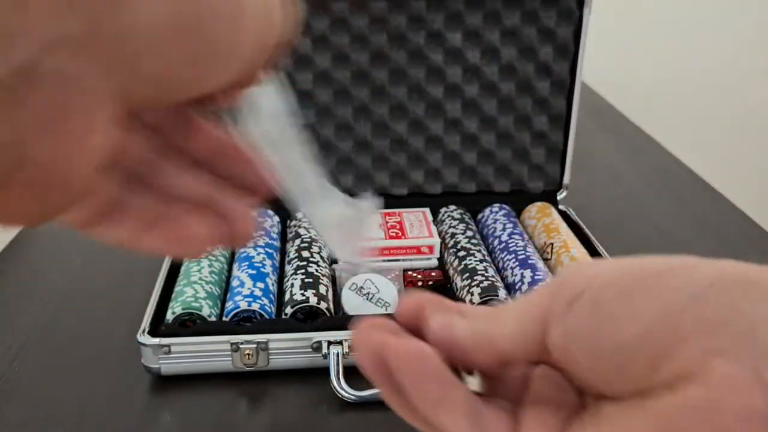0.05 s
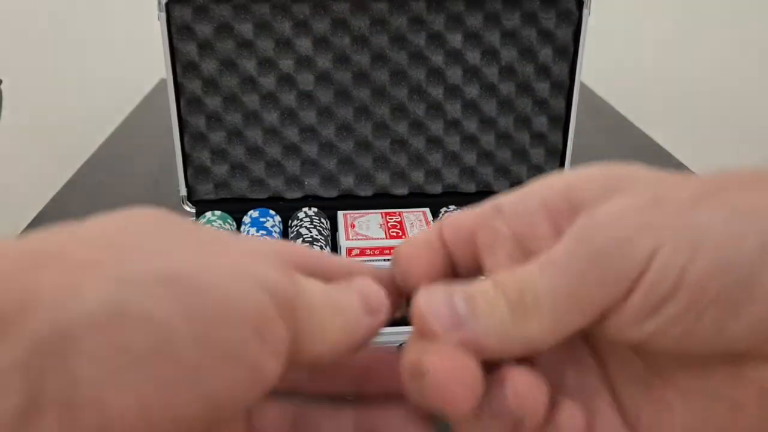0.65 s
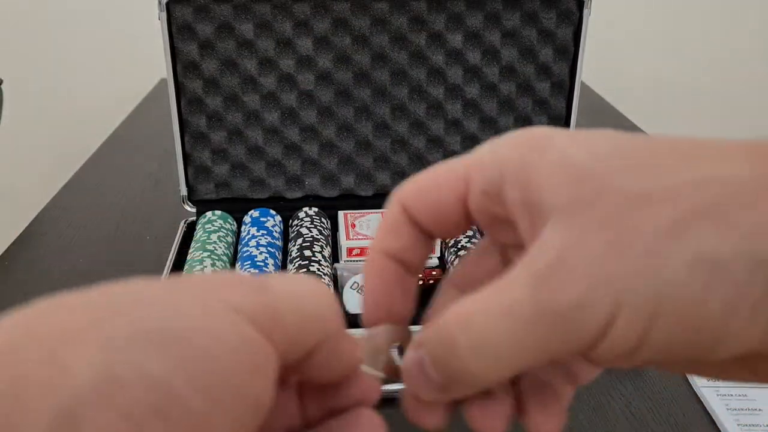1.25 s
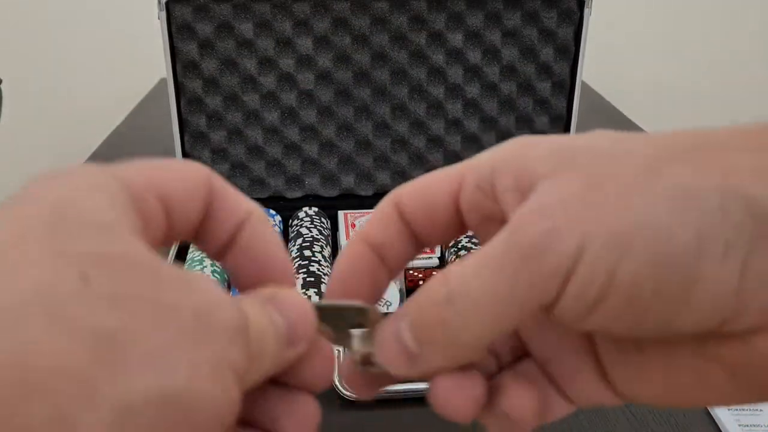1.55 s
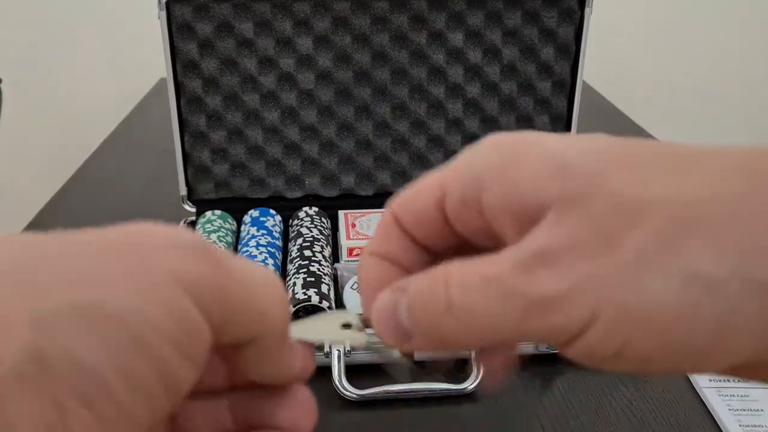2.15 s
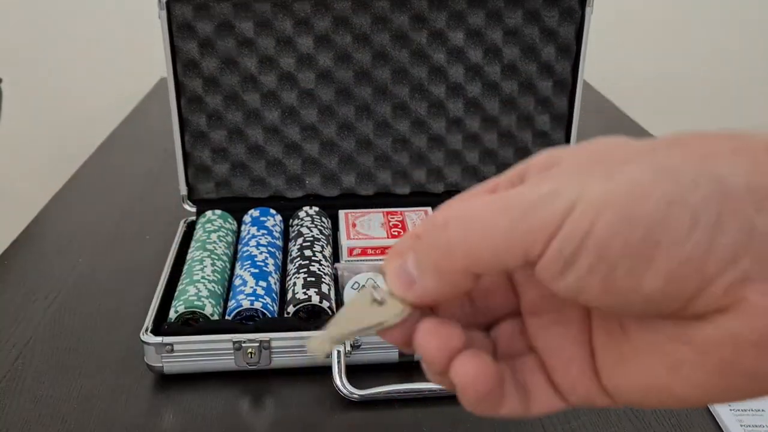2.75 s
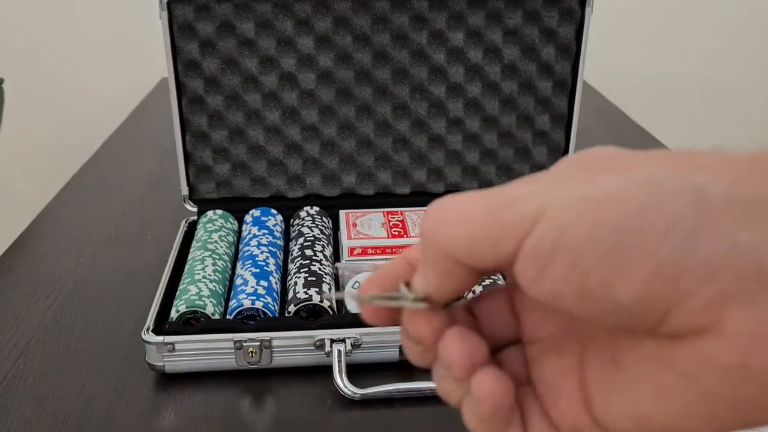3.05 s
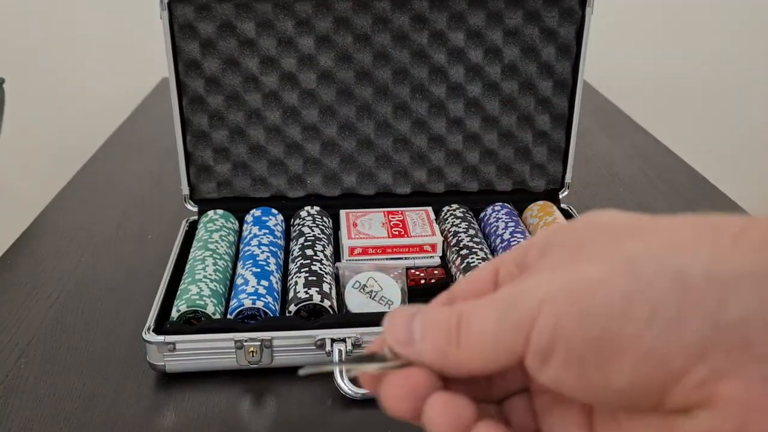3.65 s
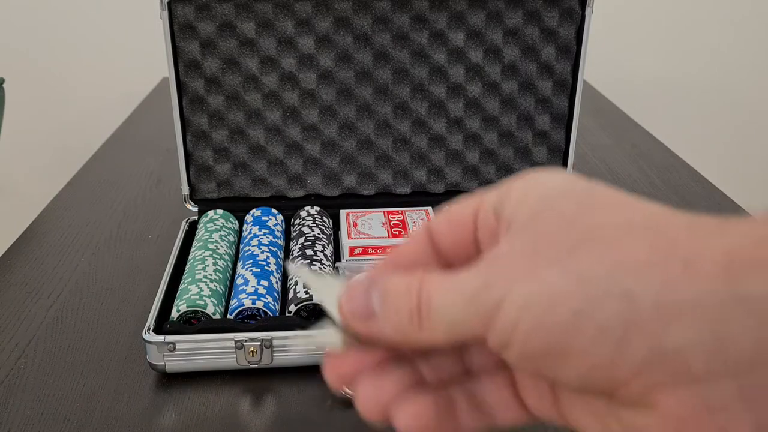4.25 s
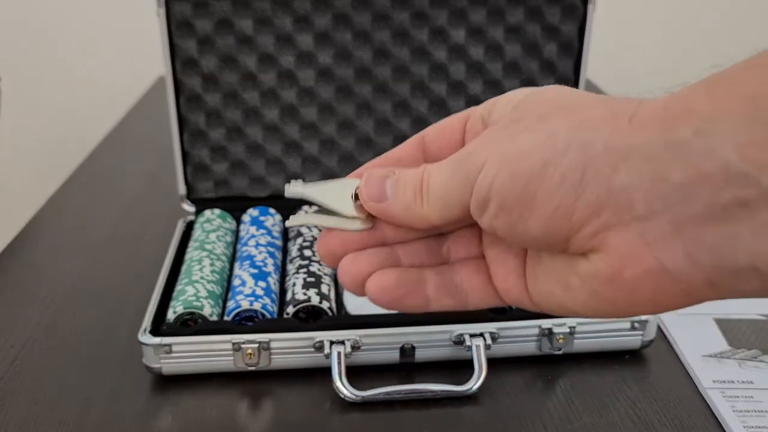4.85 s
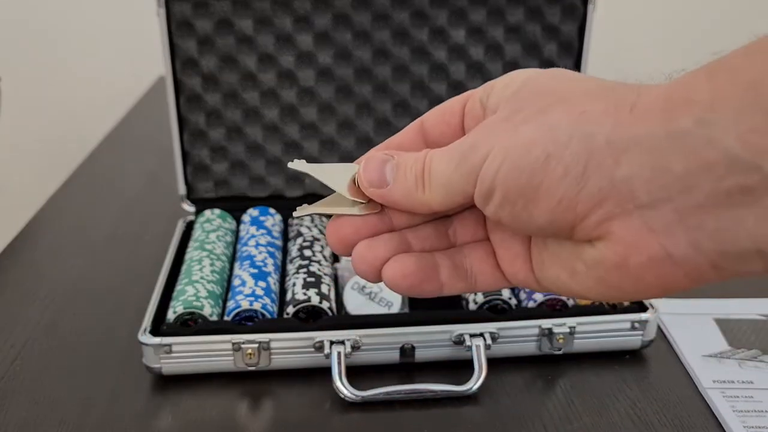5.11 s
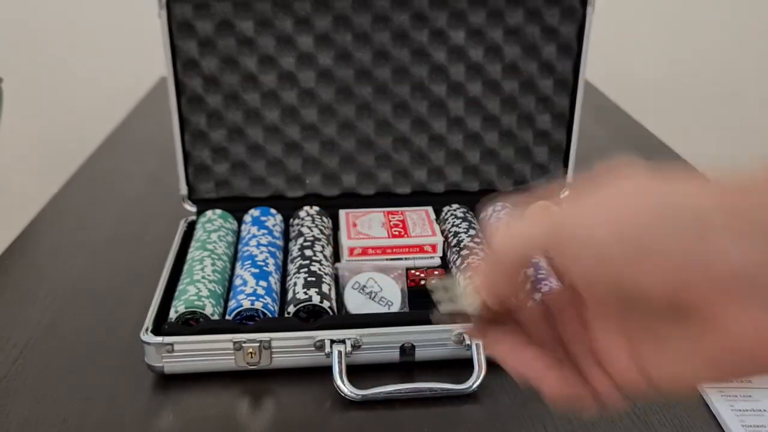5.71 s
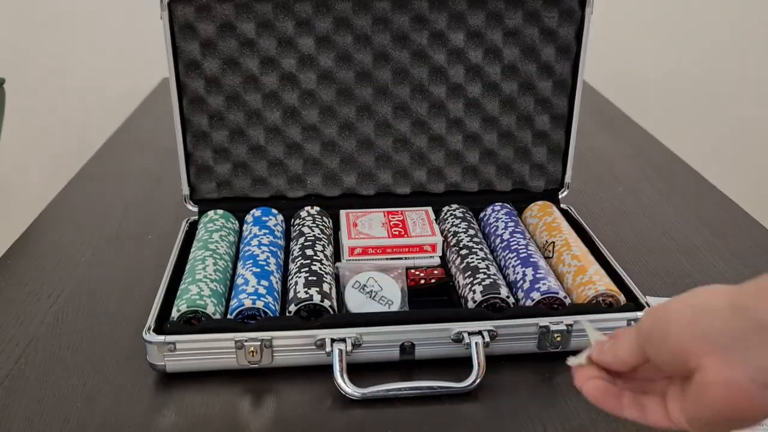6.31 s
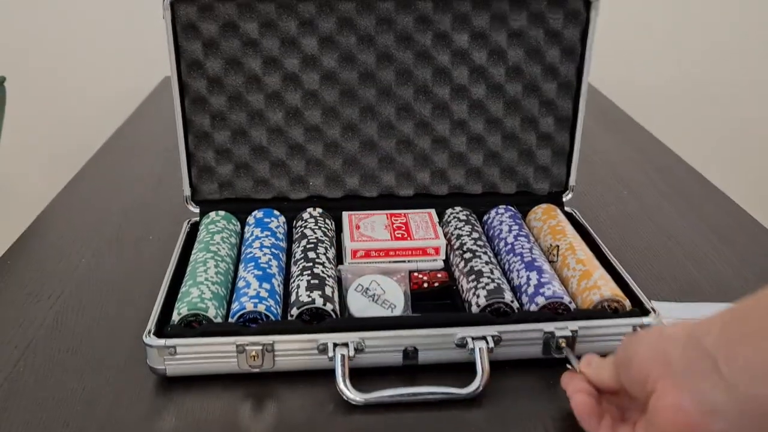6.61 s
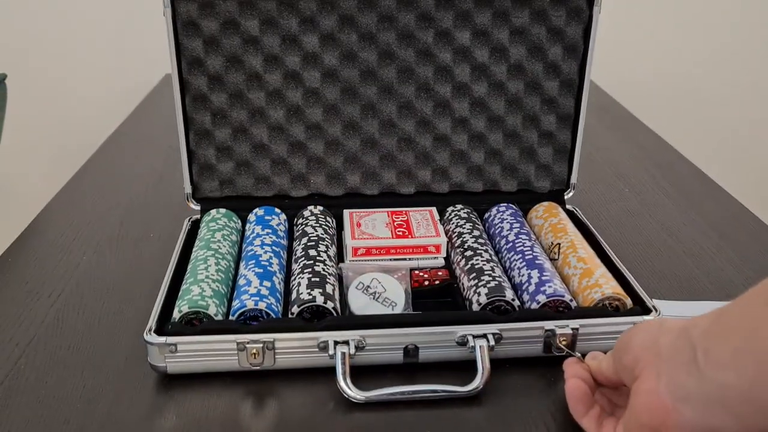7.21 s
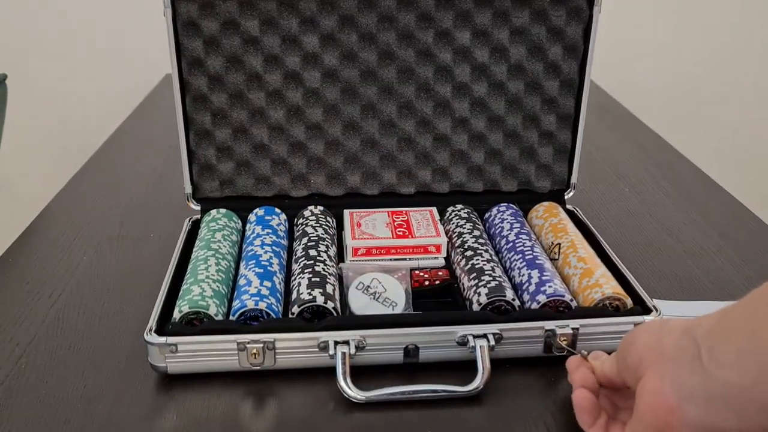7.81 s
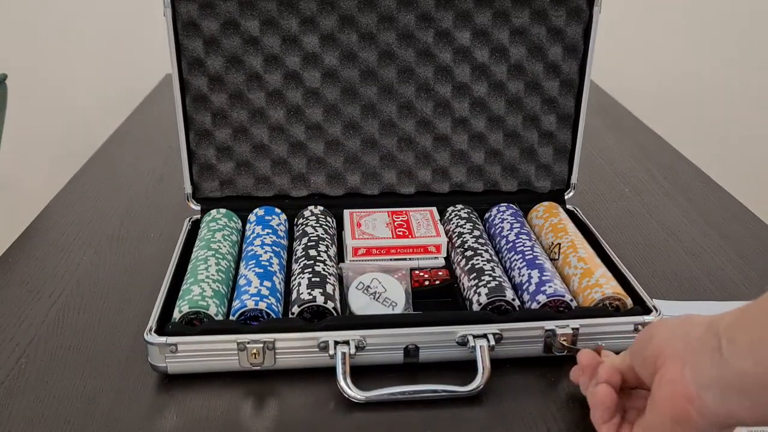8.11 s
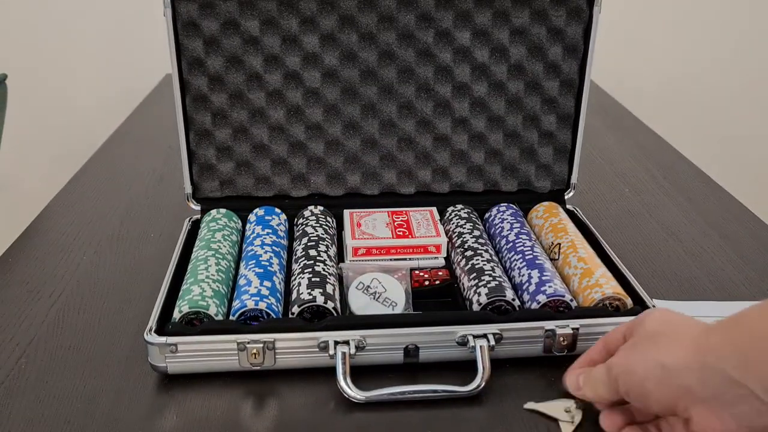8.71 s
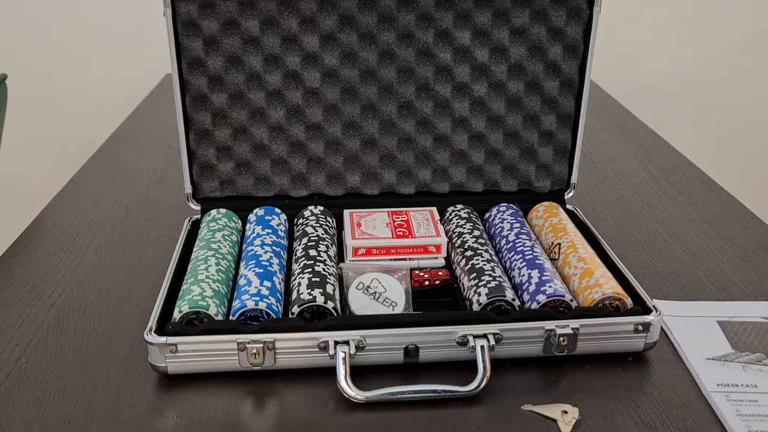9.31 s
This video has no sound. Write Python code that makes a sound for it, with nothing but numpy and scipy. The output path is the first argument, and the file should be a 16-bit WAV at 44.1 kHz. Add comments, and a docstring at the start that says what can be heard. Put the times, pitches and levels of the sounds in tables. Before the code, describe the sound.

A thin plastic bag rustles and crinkles softly for the first half second, close to a stereo microphone. From 0.8 to 1.5 seconds two small metal keys slide and tick between fingers. They clink brightly from 2.2 to 2.5 seconds, with a soft puff of air on the microphone. Faint, sparse sliding squeaks follow until about 4.4 seconds, then a lull, and a few more ticks near 5.6 to 5.8. From 6.5 to 7.5 seconds, further off, a key rubs, scrapes and catches in an aluminium case's latch, knocking sharply at 6.7. The latch clicks again around 8.2, and a hand bumps softly along the wooden table. At 8.7 a key drops on the table, bouncing rapidly with a high ring, the loudest moment. A faint touch and scrape come near 9.5. The small, bare room adds short echoes and a faint hum.

```python
"""Two small metal keys tick, slide and clink in the fingers, close to a stereo microphone.
They come out of a rustling plastic bag. Further off, one is tried in the latch of an aluminium
chip case, knocking its wall, then dropped on the wooden table, where it bounces and rings.
The place is a small, bare room with a faint hum; the hands stir the air at the microphone."""
import sys
import numpy as np
from scipy import signal
from scipy.fft import rfft, irfft, next_fast_len
from scipy.io import wavfile
from scipy.ndimage import uniform_filter1d

SR = 44100
rng = np.random.default_rng(int(sys.argv[2]) if len(sys.argv) > 2 else 0)


def wrap_up_sound(samples):
    """Save the sound to the file named by the first command line argument, as 16-bit audio."""
    columns = np.atleast_2d(samples).T
    # keep every value between -1 and 1, then stretch to whole-number steps
    tamed = np.clip(columns, -1, 1)
    steps = np.round(tamed * 32767).astype(np.int16)
    wavfile.write(sys.argv[1], SR, steps)


N = 421596
HIT_SIZE = 2 ** 15
T, AGE = np.arange(N) / SR, np.arange(HIT_SIZE) / SR  # seconds into the scene, and into a hit

# steady hum in the room: pitch_hz, level_db
HUM_TONES = [(49.5, -76.5), (272, -74), (457, -77.5)]
# reverberation of the bare walls: band_hz, t60_s, level_db
ROOM_DECAY = [(150, 0.26, 5), (1510, 0.51, -7), (2920, 0.45, -4.5), (6900, 0.32, -4), (15000, 0.064, -5)]

# strokes that swell and fade: centre_s, level_db, half_length_s
DRAUGHT_PUFFS = [(2.2, -56, 0.24)]  # air stirred by the hands at the microphone
BAG_RUSTLES = [(0, -49, 0.0095), (0.22, -72, 0.14), (0.468, -59.5, 0.021)]  # a brief burst opens the scene; later the bag is put aside
SCRAPE_STROKES = [(6.845, -53.5, 0.033), (7.128, -59, 0.024), (8.695, -57, 0.054), (9.502, -63.5, 0.065)]  # key and hand in the lock and over the table
CASE_RUBS = [(6.467, -58, 0.038), (6.56, -59.5, 0.15), (7.161, -48, 0.041), (7.292, -46.5, 0.012),
             (8.273, -53.5, 0.076)]  # metal and skin on the case
HAND_BUMPS = [(8.455, -53.5, 0.0094), (8.54, -66, 0.049)]  # the hand along the table

# creases of the bag buckling: start_s, level_db, tilt_db_per_octave
BAG_CREASES = [(0.11, -61, -1), (.289, -65, 27), (0.436, -55, -2), (0.4653, -51.5, 8.5)]
# the key catching in the latch: start_s, knock_db, tilt_db_per_octave, click_db
LATCH_CATCHES = [(6.525, -51, -9, -84), (6.7426, -29, 0, -48.5), (6.834, -47, 9.5, -79),
                 (6.9212, -41, 2, -85), (7.102, -50, -2, -63), (7.113, -48, 10.5, -62),
                 (7.151, -38, 2, -52), (7.1756, -40.5, 0.5, -63), (7.24, -52.5, -6, -86),
                 (7.2925, -44, 0.5, -71), (7.4463, -37.5, -2, -78), (8.2275, -33, 6, -46),
                 (8.289, -42.5, 6, -54)]
# fingers and key touching the table: start_s, knock_db, tilt_db_per_octave
TABLE_TOUCHES = [(8.448, -56.5, 2.5), (8.625, -44, -1), (8.714, -35.5, 5), (9.4597, -52, -6),
                 (9.47, -58, -1)]
# the dropped key bouncing: start_s, knock_db, click_db, ring_db
KEY_BOUNCES = [(8.7209, -25, -37.5, -54.5), (8.7228, -30.5, -31, -57), (8.7255, -21.5, -33, -37),
               (8.7315, -28.5, -38.5, -42), (8.7395, -31, -35, -43), (8.7535, -36.5, -40, -28.5),
               (8.7778, -31.5, -39.5, -37)]
# key sliding over key: centre_s, level_db, half_length_s, pitch_hz
KEY_SLIDES = [(0.857, -62, 0.036, 5800), (0.938, -57.5, 0.021, 6000), (2.666, -66, 0.0056, 7150),
              (2.791, -67.5, 0.0076, 6700), (3.559, -65, 0.011, 6940), (3.682, -75, 0.063, 6740),
              (3.843, -62.5, 0.015, 4080), (4.353, -66.5, 0.0067, 6250), (5.996, -71, 0.035, 7000)]
# pinched keys ticking; the point struck sets the top modes: start_s, level_db, top_modes_db
KEY_TICKS = [(0.8257, -43.5, 4.5), (0.987, -58.5, 5), (1.053, -67, -2), (1.2530, -53.5, 8),
             (1.301, -62.5, 2), (1.4897, -66.5, -5), (5.595, -51.5, 11), (5.796, -63.5, -4),
             (5.822, -49.5, 0.5), (5.8336, -51, 5)]
# loose keys clinking; the point struck trades the middle mode for the top pair:
# start_s, click_db, ring_db, top_pair_db
KEY_CLINKS = [(2.206, -49, -40.5, 5), (2.2379, -44.5, -34, 2.5), (2.2435, -61, -33, 8.5),
              (2.3265, -47.5, -42, -3.5), (2.4625, -68, -53, 2.5), (2.4975, -49, -47, -2)]

# resonances of latch and case wall: pitch_hz, t60_s, level_db
CASE_MODES = [(362, 0.023, -18.5), (650, 0.043, -11.5), (1108, 0.027, 1), (1246, 0.037, -1),
              (1896, 0.045, -1.5), (2087, 0.041, -1), (2830, 0.011, 2.5), (3014, 0.02, -5),
              (5856, 0.02, -14.5), (7410, 0.014, -15.5)]
# resonances of the table and what stands on it: pitch_hz, level_db
TABLE_MODES = [(272, -10), (400, -9), (647, 1.5), (982, -2), (1138, -2), (1231, 1.5), (1420, 2.5),
               (1563, 3), (1795, 9), (2126, 0), (2170, 4), (2372, -5.5), (2735, -12.5), (2980, -6),
               (3163, 7.5), (3338, 5)]
# modes of a key damped between the fingers: pitch_hz, t60_s, level_db
PINCHED_MODES = [(4880, 0.009, 5), (11200, 0.007, 5), (13000, .007, 4.5)]
# bending modes of the two keys: the lowest mode once for each key, close in pitch, and a close pair at the top:
# pitch_hz, held_t60_s, free_t60_s, level_db
KEY_MODES = [(4902, .18, .14, 1), (4950, .15, .14, -1), (10755, .16, .22, -.5), (12630, .13, .11, 1.5),
             (12772, .15, .11, -3)]
# how a blow on the edge or on the face rings each of those modes: gain_db
EDGE_DB, FACE_DB = [0, -5, -6, -3, -4], [-19, -20, -19, 1, -7]

# spectra of the noises: frequency_hz, relative_db
AIR_SPECTRUM = [(35, -3), (70, -7), (170, -11), (270, -3), (400, -11), (750, -13), (1500, -20), (3000, -29),
                (5500, -38.5), (8500, -55.5), (12000, -42)]  # still room
DRAUGHT_SPECTRUM = [(32, -7), (50, -7), (80, -21.5), (500, -70)]  # moving air on the microphone
FILM_SPECTRUM = [(200, -10), (1000, 3), (7500, -8), (10000, -16), (15000, -20)]  # plastic film
SCRAPE_SPECTRUM = [(500, -17.5), (2000, 3.5), (3200, -1), (4200, -20.5), (15000, -32.5)]  # key and hand scraping
RUB_SPECTRUM = [(150, -7), (900, 6), (2600, 0), (4200, -5.5), (7000, -10.5), (10000, -24.5), (15000, -28.5)]  # rubbing on the case
LATCH_SPECTRUM = [(150, -16.5), (380, -7), (1200, -8), (2000, 6), (3000, -3), (4200, -19.5), (7000, -21),
                  (15000, -49.5)]  # knock in the latch
BUMP_SPECTRUM = [(130, -11), (350, -5), (600, -14), (3000, -38)]  # hand on wood
WOOD_SPECTRUM = [(150, -21.5), (280, -5), (750, -6.5), (1300, 6), (2400, 0.5), (3200, -0.5), (4000, -11),
                 (5800, -27.5), (8000, -35)]  # knock on wood
CLICK_SPECTRUM = [(800, -28.5), (5000, 3), (8000, -2), (10000, -1.5), (13000, 0), (15500, -8.5)]  # metal click
STEEL_SPECTRUM = [(3000, -16.5), (4700, -5.5), (6500, -6), (9000, -13.5), (11200, -4.5), (13000, -1.5),
                  (15500, -10.5)]  # key on key

TOP_HZ = 15750  # upper edge of the sound
SHIMMER_DB = 2.2  # flutter of a turning key's ring


def undb(db):
    """Decibels to gain."""
    return 10 ** (np.asarray(db) / 20)


def unit(x):
    """Scale a steady sound to rms 1."""
    return x / np.sqrt(np.mean(x ** 2))


def punch(x):
    """Scale a hit to rms 1 over its first 10 ms."""
    return x / np.sqrt(np.mean(x[..., :int(.01 * SR)] ** 2))


def add(out, start_s, hit):
    """Mix a hit into the track."""
    start = int(start_s * SR)
    out[:, start:start + hit.shape[-1]] += hit[..., :N - start]


def layer(*parts):
    """Sum the parts of a hit, which differ in length."""
    size = max(part.shape[-1] for part in parts)
    return sum(np.pad(part, [(0, 0), (0, size - part.shape[-1])]) for part in parts)


def strokes(rows):
    """Gain over time of hand strokes, each a bell-shaped swell and fade."""
    return sum(undb(db) * np.exp(-np.minimum(((T - centre_s) / half_s) ** 2, 50))
               for centre_s, db, half_s in rows)


def noise(size, width):
    """Stereo white noise; width is side over mid."""
    mid, side = rng.standard_normal((2, size))
    return np.array([mid + width * side, mid - width * side])


def colour(x, spectrum, tilt=0):
    """Causal filter with the given spectrum, tilted in dB per octave above 500 Hz."""
    size = next_fast_len(x.shape[-1])
    hz, db = np.transpose(spectrum)
    bin_hz = np.clip(np.arange(size // 2 + 1) * SR / size, hz[0], hz[-1])
    shape_db = np.interp(np.log2(bin_hz), np.log2(hz), db)
    tilt_db = tilt * np.log2(np.maximum(bin_hz, 500) / 2000)
    cepstrum = irfft(np.log(undb(shape_db + tilt_db)), size)
    cepstrum[1:size // 2] *= 2  # folded for minimum phase
    cepstrum[size // 2:] = 0
    return irfft(rfft(x, size) * np.exp(rfft(cepstrum)), size)[..., :x.shape[-1]]


def crack(spectrum, decay_ms, width, tilt=0, size=4096):
    """A contact: a burst of micro-impacts that swells and dies within milliseconds."""
    age = AGE[:size] * 1000 / decay_ms
    burst = noise(size, width) * np.sqrt(age) * np.exp(-age)
    return punch(colour(burst, spectrum, tilt))


def friction(spectrum, grain_db, grain_s, width):
    """Stick and slip: brief grains of very uneven strength."""
    slips = undb(grain_db * rng.standard_normal(N))[(T / grain_s).astype(int)]
    return unit(colour(noise(N, width) * slips, spectrum))


def ring(hz, t60, db, detune, spread, rise_ms, shimmer_db=0, turn_s=0.0031):
    """Modes build up in the contact and decay; a turning key beams each on and off the microphone."""
    mistune, phase = rng.standard_normal((len(hz), 2)).T
    turns = rng.standard_normal((len(hz), 128))
    age = AGE[:int(np.max(t60) * SR)]
    pole = 2j * np.pi * hz * (1 + detune * mistune) - np.log(1000) / t60
    facing = np.array([np.interp(age / turn_s, np.arange(len(row)), row) for row in turns])
    build_up = 1 - np.exp(-age * 1000 / rise_ms)
    modes = np.exp(pole[:, None] * age) * undb(shimmer_db * facing) * build_up
    stereo_phase = spread * np.outer([1, -1], phase * np.minimum(hz / 1000, 1))
    gains = undb(db) * np.sign(mistune) * np.exp(1j * stereo_phase)
    return np.sqrt(2) * (gains @ modes).imag


def chatter(tone, depth, grain_s):
    """Metal that still touches buzzes, which roughens its ring."""
    buzz = unit(uniform_filter1d(rng.standard_normal((2, HIT_SIZE)), int(grain_s * SR), axis=1))
    return tone * (1 + depth * buzz[:, :tone.shape[-1]]) / np.sqrt(1 + depth ** 2)


def choke(tone, after_s, share, fade_s=.003):
    """A further contact damps a ring, leaving only a share of it."""
    fade = np.exp(-np.maximum(AGE[:tone.shape[-1]] - after_s, 0) / fade_s)
    return tone * (share + (1 - share) * fade)


def stereo_pair(x, apart_hz, bass_width):
    """Long waves reach both capsules of the microphone nearly alike, so the bass is narrow."""
    mid, side = (x[0] + x[1]) / 2, (x[0] - x[1]) / 2
    treble = signal.sosfiltfilt(signal.butter(1, apart_hz, "high", fs=SR, output="sos"), side)
    side = treble + bass_width * (side - treble)
    return np.array([mid + side, mid - side])


def off_centre(x, lag_ms):
    """A source off centre reaches the right capsule later, or sooner if the lag is negative."""
    size = next_fast_len(N)
    hz = np.arange(size // 2 + 1) * SR / size
    delay = np.exp(-2j * np.pi * hz * lag_ms / 1000)
    right = irfft(rfft(x[1], size) * delay, size)[:N]
    return np.array([x[0], right])


def room_tone():
    """Quiet room air, a wavering hum and the draught of hands moving at the microphone."""
    air = colour(noise(N, width=0.98), AIR_SPECTRUM)
    air = undb(-64.5) * unit(stereo_pair(air, apart_hz=635.5, bass_width=0.26))
    knots_s = np.linspace(0, T[-1], 100)
    hum = 0
    for hz, db in HUM_TONES:
        waver = 1 + 0.00912 * np.interp(T, knots_s, rng.standard_normal(len(knots_s)))
        hum = hum + undb(db) * np.sqrt(2) * np.sin(2 * np.pi * np.cumsum(hz * waver) / SR)
    draught = strokes(DRAUGHT_PUFFS) * unit(colour(noise(N, width=0.24), DRAUGHT_SPECTRUM))
    return air + hum + draught


def room_echoes(x, onset_s=0.0028):
    """Diffuse echoes from bare walls, shortest in the top treble and unrelated at the two capsules."""
    hz, t60, db = np.transpose(ROOM_DECAY)
    log_hz = np.log(np.maximum(np.arange(HIT_SIZE // 2 + 1) * SR / HIT_SIZE, 1))
    spectrum = rfft(rng.standard_normal((2, HIT_SIZE)))
    onset = np.clip(AGE / onset_s - .5, 0, 1)
    response = 0
    for share, band_t60, gain in zip(np.eye(len(hz)), t60, undb(db)):
        fade = onset * np.exp(-np.log(1000) * AGE / band_t60)
        band = irfft(spectrum * np.interp(log_hz, np.log(hz), share))
        response = response + gain * band * fade / np.linalg.norm(fade)
    return signal.fftconvolve(x, response, axes=1)[:, :N]


def plastic_bag():
    """Close up, thin film rustles and its creases buckle, softly or with a snap."""
    out = strokes(BAG_RUSTLES) * friction(FILM_SPECTRUM, grain_db=3.5, grain_s=0.00074, width=0.98)
    for start_s, db, tilt in BAG_CREASES:
        add(out, start_s, undb(db) * crack(FILM_SPECTRUM, decay_ms=.75, width=1.0, tilt=tilt))
    return out


def scraping():
    """Slow strokes of metal and skin catch and slip, which makes a hoarse scrape."""
    return strokes(SCRAPE_STROKES) * friction(SCRAPE_SPECTRUM, grain_db=3.0, grain_s=0.0012, width=.7)


def case_rubbing():
    """Metal and skin rub on the case and excite its resonances."""
    rubbing = strokes(CASE_RUBS) * friction(RUB_SPECTRUM, grain_db=2.5, grain_s=0.00098, width=1.0)
    hz, t60, mode_db = np.transpose(CASE_MODES)
    body = ring(hz, t60, mode_db, detune=0, spread=0.4, rise_ms=0.38)
    resonance = signal.fftconvolve(rubbing, body / np.linalg.norm(body[0]), axes=1)[:, :N]
    return undb(-6.5) * rubbing + undb(-24.0) * resonance


def key_in_latch(firm_db=-35, wall_below_hz=1500):
    """Each catch of the key clicks and knocks the case wall; a weak or bright catch drags longer."""
    out = np.zeros((2, N))
    hz, t60, mode_db = np.transpose(CASE_MODES)
    for start_s, knock_db, tilt, click_db in LATCH_CATCHES:
        contact_ms = 1.7 * 2 ** ((firm_db - knock_db) / 27.5 + tilt / 12)
        # bright catches lie deep in the lock and hardly move the wall
        wall_loss_db = 1.8 * max(tilt, 0) * (hz < wall_below_hz)
        struck_db = mode_db + tilt * np.log2(hz) - wall_loss_db
        # the hand's pressure detunes the latch from knock to knock, and the key grates on
        wall = punch(ring(hz, t60, struck_db, detune=.02, spread=0.92, rise_ms=contact_ms / 2))
        wall = chatter(wall, depth=.45, grain_s=0.0022)
        knock = crack(LATCH_SPECTRUM, contact_ms * 1.9, width=1.0, tilt=tilt)
        add(out, start_s, undb(knock_db) * layer(undb(-9.5) * knock, undb(-6.0) * wall))
        add(out, start_s, undb(click_db) * crack(CLICK_SPECTRUM, contact_ms * 0.91, width=0.85))
    return out


def table_contact(knock_db, click_db, tilt, t60=.15):
    """One contact with the table: the wood knocks, the top rings and the metal clicks."""
    hz, mode_db = np.transpose(TABLE_MODES)
    board = punch(ring(hz, t60, mode_db + tilt * np.log2(hz), detune=0, spread=0.33, rise_ms=1.9))
    wood = crack(WOOD_SPECTRUM, decay_ms=2.5, width=0.67, tilt=tilt)
    click = crack(CLICK_SPECTRUM, decay_ms=1.0, width=1.0)
    knock = layer(undb(-2.5) * wood, undb(-11.5) * board)
    return layer(undb(knock_db) * knock, undb(click_db) * click)


def hand_on_table():
    """The hand bumps along the table; fingers and key touch it with a knock and a faint click."""
    out = strokes(HAND_BUMPS) * friction(BUMP_SPECTRUM, grain_db=5.5, grain_s=0.0068, width=0.23)
    for start_s, knock_db, tilt in TABLE_TOUCHES:
        add(out, start_s, table_contact(knock_db, click_db=knock_db - 29, tilt=tilt))
    return out


def dropped_key(flat_s=8.75):
    """The key bounces on its edge, then falls flat; the table knocks and the free key rings on."""
    out = np.zeros((2, N))
    hz, _, free_t60, mode_db = np.transpose(KEY_MODES)
    for start_s, knock_db, click_db, ring_db in KEY_BOUNCES:
        add(out, start_s, table_contact(knock_db, click_db, tilt=1.9))
        struck_db = mode_db + (EDGE_DB if start_s < flat_s else FACE_DB)
        tone = ring(hz, free_t60, struck_db, detune=0.00088, spread=0.85, rise_ms=3.2,
                    shimmer_db=SHIMMER_DB)
        add(out, start_s, undb(ring_db) * chatter(tone, depth=0.18, grain_s=0.0019))
    return out


def sliding_keys(q=13):
    """Edge grates over edge; the grains ring a squeak set by the grip, with its overtones."""
    grains = friction(STEEL_SPECTRUM, grain_db=6.5, grain_s=0.003, width=0.86)
    out = 0
    for centre_s, db, half_s, hz in KEY_SLIDES:
        partials = [signal.lfilter(*signal.iirpeak(k * hz, q, fs=SR), grains) / k ** 1.46
                    for k in (1, 2, 3) if k * hz < TOP_HZ]
        squeak = unit(sum(partials))
        out = out + (undb(-3) * grains + squeak) * strokes([(centre_s, db, half_s)])
    return out


def ticking_keys(top_above_hz=8000):
    """Pinched keys only tick: the fingers damp their modes at once, and the changing grip detunes them."""
    out = np.zeros((2, N))
    hz, t60, mode_db = np.transpose(PINCHED_MODES)
    for start_s, db, top_db in KEY_TICKS:
        tick = crack(STEEL_SPECTRUM, decay_ms=.9, width=0.95, tilt=.2 * top_db)
        struck_db = mode_db + top_db * (hz > top_above_hz)
        tink = punch(ring(hz, t60, struck_db, detune=.008, spread=0.74, rise_ms=1.0))
        tink = chatter(tink, depth=0.82, grain_s=0.0003)
        add(out, start_s, undb(db) * layer(undb(-6) * tick, tink))
    return out


def clinking_keys(grip_db=-11.5):
    """Hanging loose, the keys ring until they touch again, or only briefly when no touch follows soon; their
    close modes beat."""
    out = np.zeros((2, N))
    hz, held_t60, _, mode_db = np.transpose(KEY_MODES)
    lean_right = undb([[-1.5], [1.5]])
    gaps_s = np.diff(np.transpose(KEY_CLINKS)[0], append=T[-1])
    for (start_s, click_db, ring_db, top_db), gap_s in zip(KEY_CLINKS, gaps_s):
        add(out, start_s, undb(click_db) * crack(STEEL_SPECTRUM, decay_ms=1.2, width=0.71))
        # the fingers damp the lowest pair of modes
        struck_db = mode_db + ring_db + [grip_db, grip_db, -top_db, top_db, top_db]
        tone = ring(hz, held_t60, struck_db, detune=0.00035, spread=0.59, rise_ms=0.92,
                    shimmer_db=SHIMMER_DB, turn_s=0.0047)
        tone = chatter(tone, depth=0.25, grain_s=.002)
        free_s = gap_s if gap_s < .04 else .012
        add(out, start_s, lean_right * choke(tone, free_s, share=0.3))
    return out


def scene():
    """The keys are held close to the microphone; latch and table are further off and wetter."""
    keys = sliding_keys() + ticking_keys() + clinking_keys()
    bag = plastic_bag()
    latch = case_rubbing() + key_in_latch() + scraping()
    table = hand_on_table() + dropped_key()
    echoes = room_echoes(undb(-3.5) * keys + undb(0.5) * bag + undb(-1.0) * latch + undb(3.5) * table)
    direct = off_centre(keys + bag, lag_ms=0.1)
    direct += off_centre(latch, lag_ms=-0.064) + off_centre(table, lag_ms=-0.0089)
    at_microphone = stereo_pair(direct + echoes, apart_hz=520, bass_width=.2) + room_tone()
    balance = undb([[-.6], [.6]])
    return balance * at_microphone


def record(dry):
    """The recorder cuts the top with a steep low-pass."""
    return signal.sosfilt(signal.ellip(8, .2, 70, TOP_HZ, fs=SR, output="sos"), dry)


dry = scene()
out = record(dry)
wrap_up_sound(out)
```